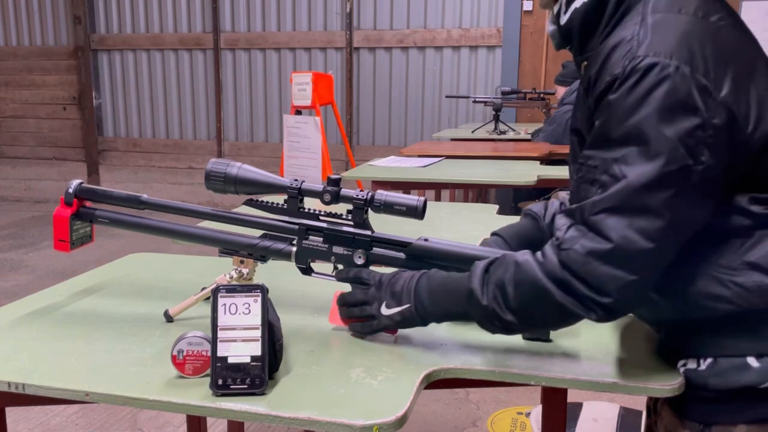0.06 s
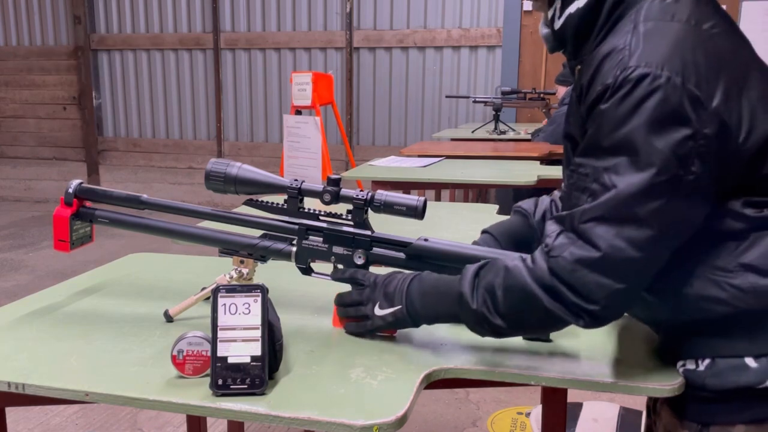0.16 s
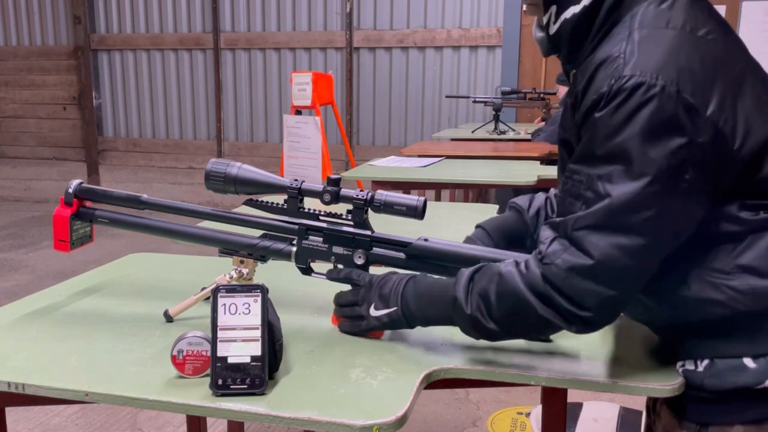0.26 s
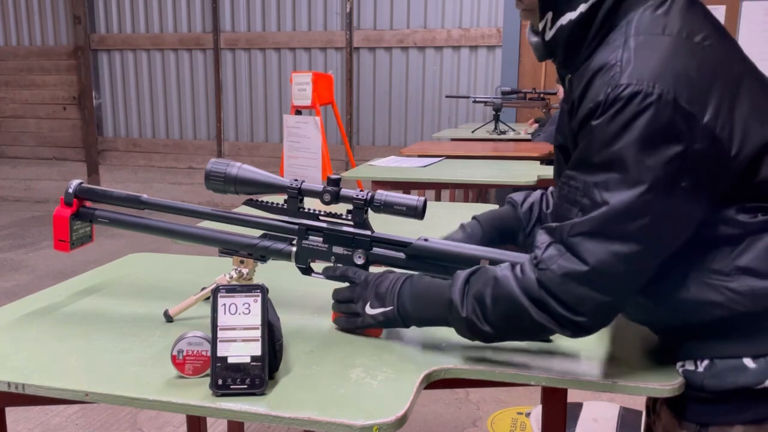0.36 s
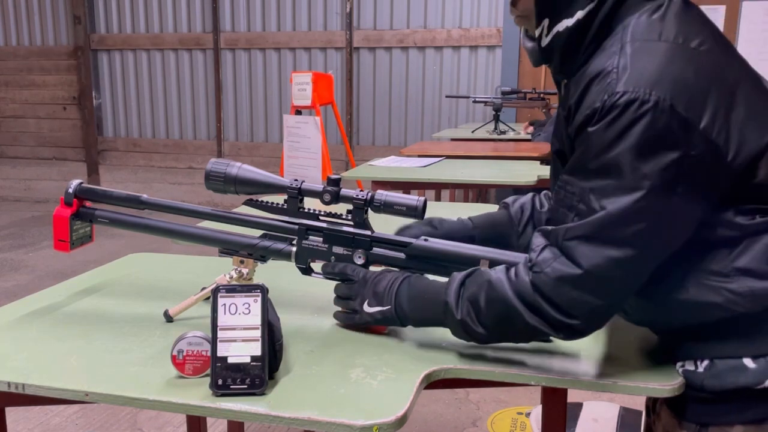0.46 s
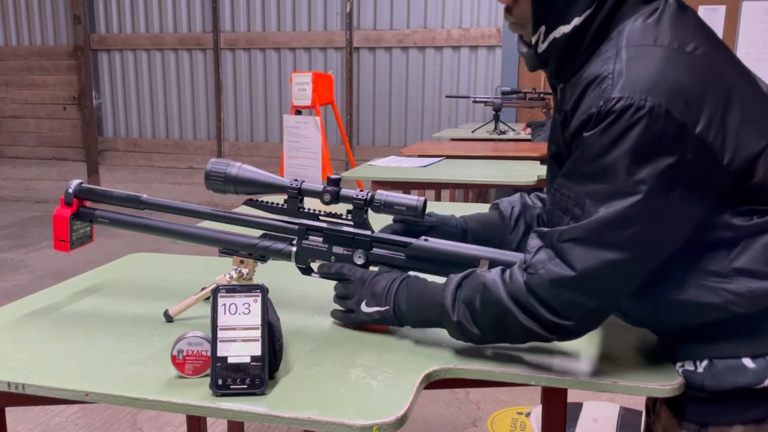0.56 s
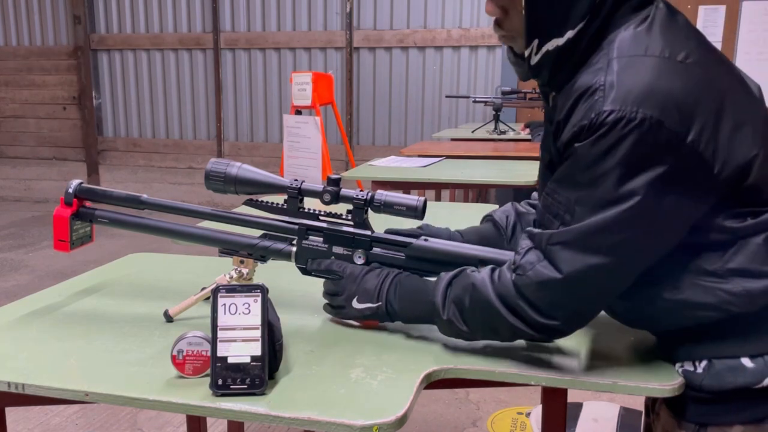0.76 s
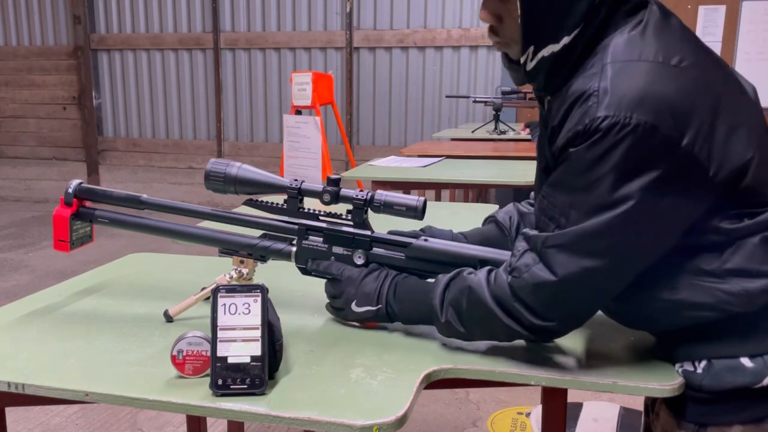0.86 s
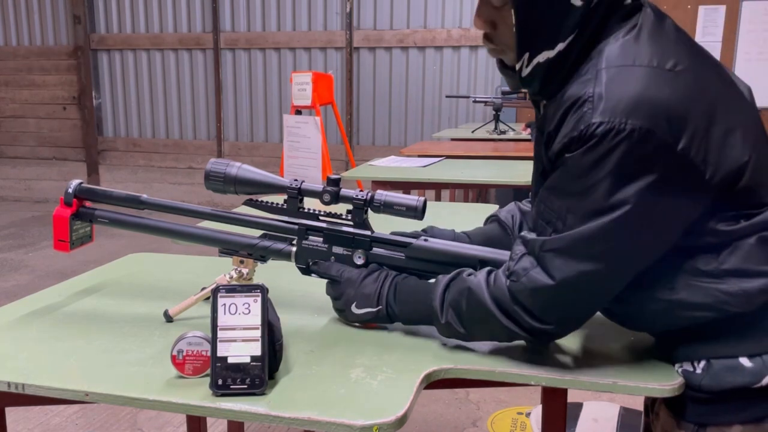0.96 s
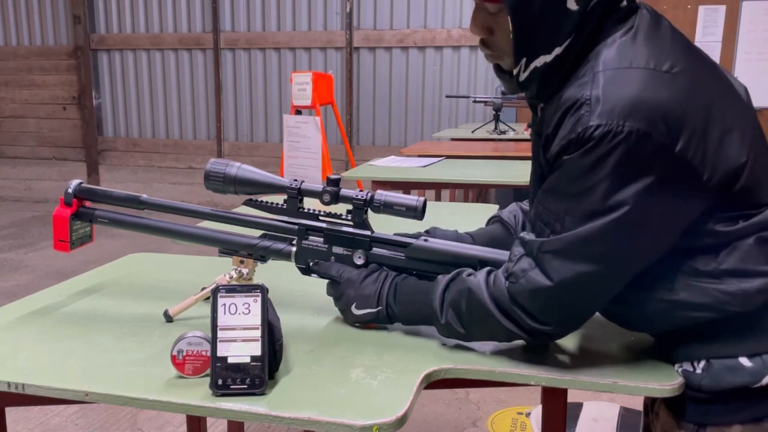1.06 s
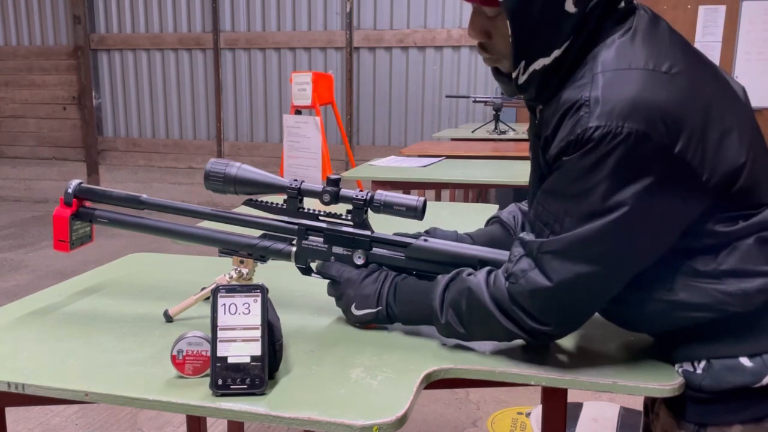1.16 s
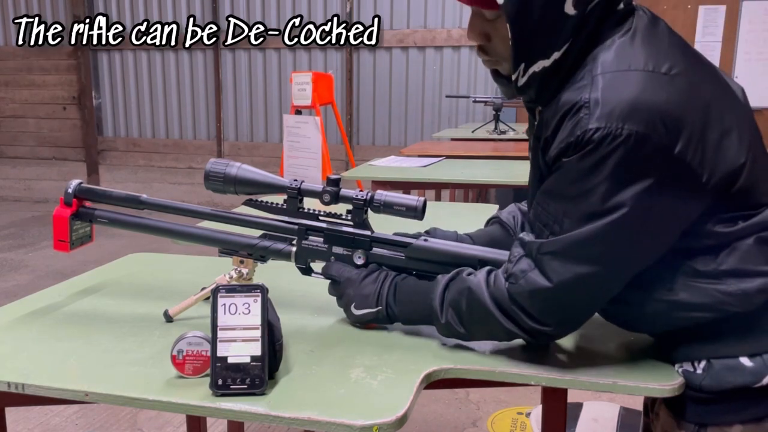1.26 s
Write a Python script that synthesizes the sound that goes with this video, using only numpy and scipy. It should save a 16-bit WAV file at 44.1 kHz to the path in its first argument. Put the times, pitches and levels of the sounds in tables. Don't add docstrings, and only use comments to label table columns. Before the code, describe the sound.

After a short moment of low room hum, a loud air rifle shot snaps out in stereo, its echoes bouncing off sheet-metal walls, followed by quiet action clicks and cloth brushing on the table.

```python
import sys
import numpy as np
from scipy import signal
from scipy.fft import rfft, irfft
from scipy.io import wavfile

SR = 44100
rng = np.random.default_rng(int(sys.argv[2]) if len(sys.argv) > 2 else 0)


def voltage_ratio(decibels):
    exponent = np.asarray(decibels, float) / 20
    return 10 ** exponent


def materialize(psi):
    bounded = np.clip(np.atleast_2d(psi).T, -1, 1)
    quanta = np.round(bounded * 32767).astype(np.int16)
    wavfile.write(sys.argv[1], SR, quanta)


N = 57330
TIME_S = np.arange(N) / SR
SHOT_S = 0.2016


def at_hz(points, hz, column=1):
    points = np.array(points)
    return np.interp(np.log(hz + 1), np.log(points[:, 0]), points[:, column])


def noise(colour):
    level_db = at_hz(colour, np.fft.rfftfreq(N, 1 / SR))
    x = irfft(rfft(rng.standard_normal(N)) * voltage_ratio(level_db), N)
    return x / np.std(x)


def noise_pair(centre, side, centre_db=0, side_db=0):
    return np.array([voltage_ratio(centre_db) * noise(centre), voltage_ratio(side_db) * noise(side)])


def resonate(x, hz, width_hz):
    r = np.exp(-np.pi * width_hz / SR)
    return signal.lfilter([1, 0, -1], [1, -2 * r * np.cos(2 * np.pi * hz / SR), r * r], x + 1e-18) / 2


def pulse(start_s, level_db):
    x = np.zeros(N)
    x[int(start_s * SR)] = voltage_ratio(level_db)
    return x


# pitch_hz, level_db
HUM_COLOUR = [(28, -22), (55, 0.5), (110, -4.5), (165, -11.5), (900, -19), (5000, -35), (9000, -46.5),
              (13000, -40)]
HUM_SIDE_COLOUR = [(18, -54.5), (30, -23), (113, -10.5), (281, -22), (394, -9.5), (448, -12), (1110, -15),
                   (11900, -39.5), (15000, -54)]


def hum():
    return noise_pair(HUM_COLOUR, HUM_SIDE_COLOUR, centre_db=-58, side_db=-65.5)


# pitch_hz, level_db (rms), time to die by 60 dB t60_s
PANELS = [(208, -56.5, 2.5), (360, -47.5, 0.97), (571, -47.5, 1.3), (1099, -44.5, 1.26), (1321, -45, 1.1),
          (1529, -42.5, 1.4), (1633, -45, 1.2), (1783, -37.5, .9), (2635, -47.5, 0.25), (2746, -39.5, 0.48),
          (3106, -44.5, .6), (3840, -41, .6), (4740, -54.5, 1.4), (5330, -44.5, .4)]


def panels():
    out = np.zeros((2, N))
    t = np.maximum(TIME_S - SHOT_S, 0)
    for hz, level_db, t60_s in PANELS:
        ring = resonate(rng.standard_normal((2, N)), hz, width_hz=25)
        build = 1 - np.exp(-t / 0.0033)
        out += ring / ring.std() * voltage_ratio(level_db - 60 * t / t60_s) * build
    return out * voltage_ratio([[0], [-7]])


# pitch_hz, early_t60_s, late_t60_s
HALL_T60 = [(100, 0.1, 1), (300, 0.26, 3.63), (1285, 0.67, 2.84), (2940, 0.67, 2.07), (6000, 0.65, 1.11),
            (9400, 0.37, 0.7), (13000, .25, 0.52)]
LATE_SHARE_DB, BUILD_S = -8, 0.0013
LOW_BUILD_CYCLES = 0.81


def dying(colour):
    t = np.maximum(TIME_S - SHOT_S, 0)
    spectrum = rfft(noise(colour))
    half_octave = 2 * np.log2(np.fft.rfftfreq(N, 1 / SR) / 40 + 1e-9)
    out = np.zeros(N)
    for k in range(18):
        hz = 40 * 2 ** (k / 2)
        band = irfft(spectrum * np.clip(1 - abs(half_octave - k), 0, 1), N)
        early_power = voltage_ratio(-120 * t / at_hz(HALL_T60, hz))
        late_power = voltage_ratio(2 * LATE_SHARE_DB - 120 * t / at_hz(HALL_T60, hz, column=2))
        build = 1 - np.exp(-t * hz / LOW_BUILD_CYCLES)
        out += band * np.sqrt(early_power + late_power) * build
    return out * (1 - np.exp(-t / BUILD_S))


# pitch_hz, level_db
HALL_COLOUR = [(100, -7.5), (300, -15.5), (1100, -2.5), (2000, -2.5), (5900, -7.5), (7600, -15.5),
               (10000, -18), (13000, -12)]
HALL_SIDE_COLOUR = [(100, -32), (400, -18), (1100, -3.5), (2500, -9.5), (5500, -14), (8800, -13.5),
                    (11500, -20), (14000, -60.5)]


def hall():
    return np.array([voltage_ratio(-26) * dying(HALL_COLOUR), voltage_ratio(-27) * dying(HALL_SIDE_COLOUR)])


# start_s, rise_s, fall_s, hiss_db, rub_db
RUSTLES = [
    (0.696, 0.0075, 0.04, -54.5, -50),
    (.76, 0.037, 0.029, -66, -66),
    (.84, 0.037, 0.069, -61.5, -53),
    (1.22, 0.0047, 0.047, -74.5, -65.5),
]
# pitch_hz, level_db
SLEEVE_COLOUR = [(3000, -7.5), (6000, 2.5), (7800, -1), (8900, 6), (10500, -3.5), (12500, -1.5),
                 (14500, -19)]
SLEEVE_SIDE_COLOUR = [(3000, -2), (6000, 2), (9000, 10), (11500, -2), (14000, -23.5)]
RUB_HZ, RUB_WIDTH_HZ = 1120, 1170


def sleeve():
    hiss, rub = np.zeros(N), np.zeros(N)
    for start_s, rise_s, fall_s, hiss_db, rub_db in RUSTLES:
        t = TIME_S - start_s
        stroke = np.where(t < 0, np.exp(-(t / rise_s) ** 2), np.exp(-abs(t) / fall_s))
        hiss += voltage_ratio(hiss_db) * stroke
        rub += voltage_ratio(rub_db) * stroke
    grain = voltage_ratio(2.01 * np.repeat(rng.standard_normal(N // 90 + 1), 90)[:N])
    body = resonate(rng.standard_normal((2, N)), RUB_HZ, RUB_WIDTH_HZ)
    body = resonate(body, RUB_HZ, RUB_WIDTH_HZ)
    cloth = noise_pair(SLEEVE_COLOUR, SLEEVE_SIDE_COLOUR, side_db=2)
    return grain * (hiss * cloth + rub * body / body.std())


# start_s, level_db, ring_hz,
# scratch_db, scratch_s
CLICKS = [
    (.4582, -41, 526, -42, 0.00082),
    (.708, -33.5, 1530, -68, 0.0037),
    (1.038, -45, 4760, -64, 0.0024),
    (1.0398, -43, 2660, -68, 0.0015),
    (1.139, -53, 3500, -65.5, 0.0023),
    (1.1916, -39, 1340, -53.5, 0.0055),
    (1.1936, -45, 470, -71, 0.0022),
]
# pitch_hz, level_db
SCRATCH_COLOUR = [(1500, -9.5), (3400, 6.5), (5000, -5.5), (6800, 0.5), (9500, -8.5), (12600, 0.5),
                  (15000, -8)]


def clicks():
    out = np.zeros((2, N))
    bright = noise_pair(SCRATCH_COLOUR, SCRATCH_COLOUR, side_db=-5)
    for start_s, level_db, ring_hz, scratch_db, scratch_s in CLICKS:
        knock = signal.lfilter([.3], [1, -.7], pulse(start_s, level_db + 3))
        ring = resonate(knock, ring_hz, ring_hz / 5.2)
        out -= ring * voltage_ratio([[0], [-16]])
        t = TIME_S - start_s
        out += voltage_ratio(scratch_db) * bright * (t > 0) * np.exp(-np.clip(t / scratch_s, 0, 9) ** 3)
    return out


HAMMER_S, HAMMER_DB, HAMMER_RISE_DB_PER_S = 0.18, -61, 700


def hammer():
    growing = voltage_ratio(HAMMER_DB + HAMMER_RISE_DB_PER_S * np.clip(TIME_S - HAMMER_S, 0, .02))
    moving = (TIME_S > HAMMER_S) * (TIME_S < SHOT_S)
    dull = signal.butter(8, 7760, fs=SR, output="sos")
    return moving * growing * signal.sosfilt(dull, noise_pair(HALL_COLOUR, HALL_SIDE_COLOUR))


# pitch_hz, level_db, time to die by 60 dB t60_s
THUD = [(106, -47.5, 0.088), (147.4, -50.5, .15), (223.4, -46, .25)]


def thud():
    soft = signal.lfilter([.0004], [1, -1.96, .9604], pulse(.228, 12))
    soft = signal.sosfilt(signal.butter(4, 89, "high", fs=SR, output="sos"), soft)
    boom = sum(voltage_ratio(level_db + 2.5) * resonate(soft, hz, 1.6 / t60_s) for hz, level_db, t60_s in THUD)
    return np.array([boom, np.zeros(N)])


# pitch_hz, level_db
BLAST_COLOUR = [(2000, -23.5), (4000, 1), (7000, -8.5), (10000, -5), (13000, -10), (15000, -8)]
BLAST_SIDE_COLOUR = [(2000, -22), (4000, -6), (6500, -0.5), (9500, 2.5), (12000, -4), (14000, -24)]


def blast():
    t = TIME_S - SHOT_S
    puff = (t > 0) * np.exp(-abs(t) / 0.0028)
    air = puff * noise_pair(BLAST_COLOUR, BLAST_SIDE_COLOUR, centre_db=-20, side_db=-16)
    chirp = resonate(pulse(.2021, -12), hz=12200, width_hz=380)
    return air + chirp * voltage_ratio([[0], [-24]])


# start_s, level_db, dullness (0 to 1), side_share_db
ARRIVALS = [(0.2016, 0, 0.3, -13.5), (.2020, -12, 0.76, 11), (0.2028, -4, 0.05, -12),
            (.2049, -6.5, 0.2, -8.5), (.2055, 0, 1, -8), (.2062, -3, 0.4, -10.5), (0.2077, -7, 0.15, -4),
            (.2135, -35, .6, 7.5), (0.2169, -12, .6, -5), (0.2232, -11, 0.5, -9), (.2325, -37, 0.4, -20),
            (0.46, -16.5, 0.66, -7), (0.4636, -25, 0.68, -3)]
# pitch_hz, width_hz, level_db
CRACK_RINGS = [(351, 46, -19.5), (580, 70, -22.5), (1141, 195, -4), (2173, 720, 7.5), (4030, 740, 6),
               (5300, 1700, 3), (7050, 620, -16), (10100, 1300, -8.5), (13300, 1500, 3)]
CRACK_SIDE_RINGS = [(700, 680, -27), (1700, 900, -7), (3300, 3800, 0), (5960, 2200, -2.5), (8800, 2800, 3),
                    (11500, 1500, -14.5)]
SCATTER_DB = 1.5


def crack():
    out = np.zeros((2, N))
    scatter_db = SCATTER_DB * rng.normal(0, 1, (30, 2, 9))
    for (start_s, level_db, dull, side_db), own_db in zip(ARRIVALS, scatter_db):
        dull = np.clip(dull, 0, .9)
        hit = signal.lfilter([(1 - dull) ** 2], [1, -2 * dull, dull ** 2], pulse(start_s, level_db))
        hit = hit[:int(.5 * SR)]
        for part, (rings, share_db) in enumerate([(CRACK_RINGS, 0), (CRACK_SIDE_RINGS, side_db)]):
            for k, (hz, width_hz, ring_db) in enumerate(rings):
                gain_db = ring_db + share_db + own_db[part, k] - 10.5
                sign = (-1) ** k
                out[part, :len(hit)] -= sign * voltage_ratio(gain_db) * resonate(hit, hz, width_hz)
    return out


def scene():
    notch = signal.iirnotch(8910, 6.7, SR)
    centre_top = signal.cheby2(10, 30, 14400, fs=SR, output="sos")
    far = signal.sosfilt(centre_top, hall()) + panels() + hum()
    far[0] = signal.lfilter(*notch, far[0])
    near = crack() + hammer() + thud() + blast() + clicks() + sleeve()
    centre, side = far + near
    centre = signal.lfilter(*notch, centre)
    left_db = 1.03
    return np.array([voltage_ratio(left_db) * (centre + side), voltage_ratio(-left_db) * (centre - side)])


def top_cut(x):
    return signal.sosfilt(signal.butter(12, 15790, fs=SR, output="sos"), x)


def record(dry):
    cut = signal.sosfilt(signal.butter(8, 14000, fs=SR, output="sos"), dry)
    peak = 1
    mix = peak * np.tanh(cut / peak)
    return top_cut(mix)


dry = scene()
out = record(dry)
materialize(out)
```